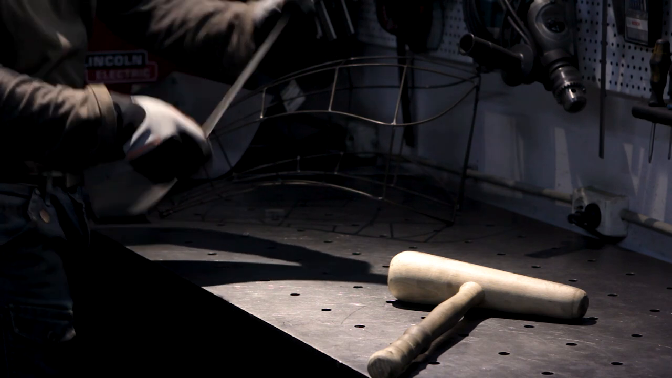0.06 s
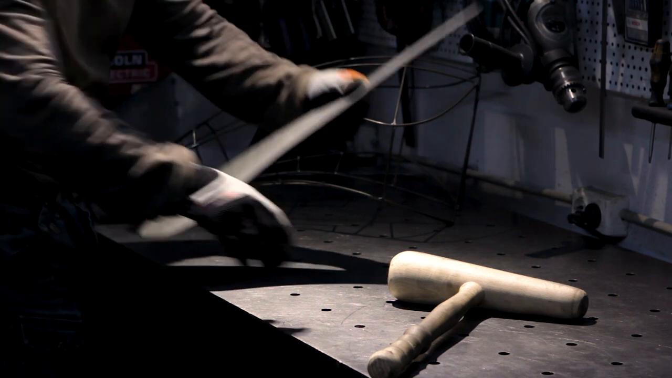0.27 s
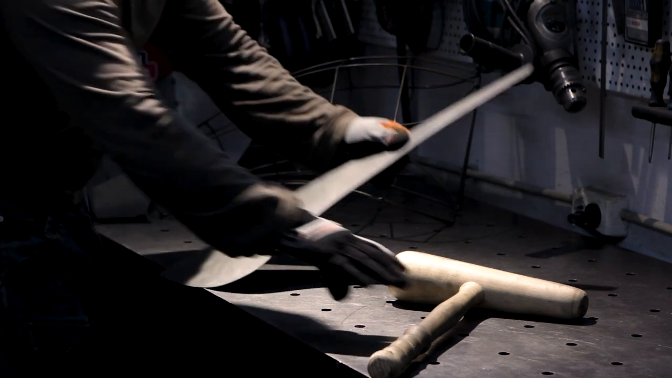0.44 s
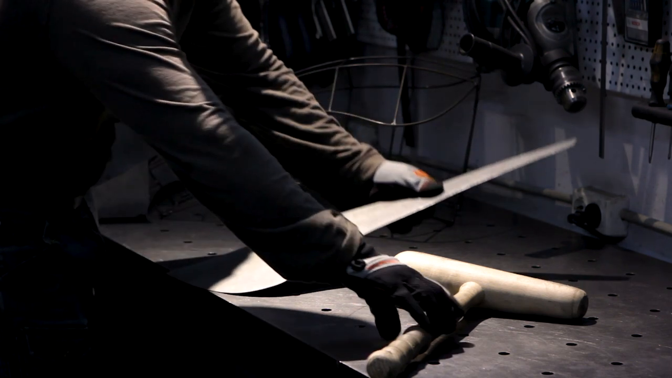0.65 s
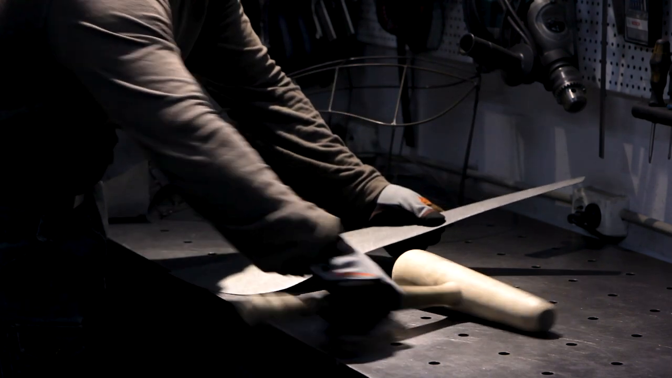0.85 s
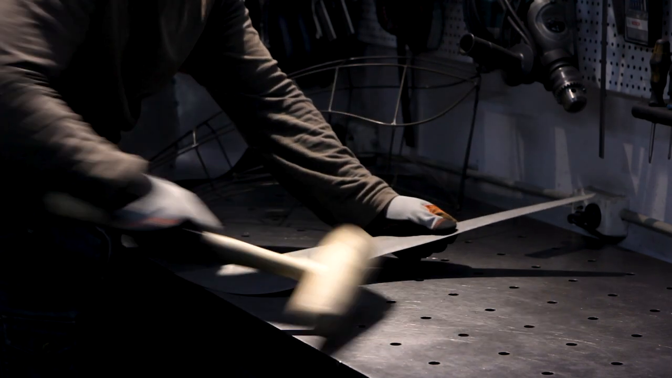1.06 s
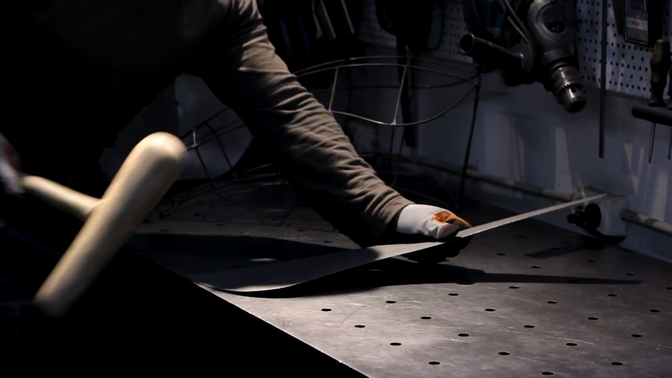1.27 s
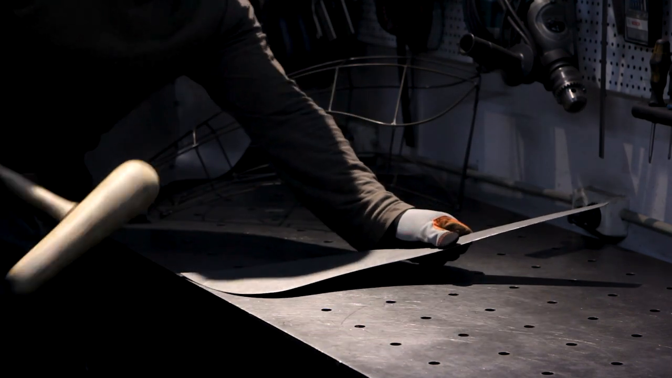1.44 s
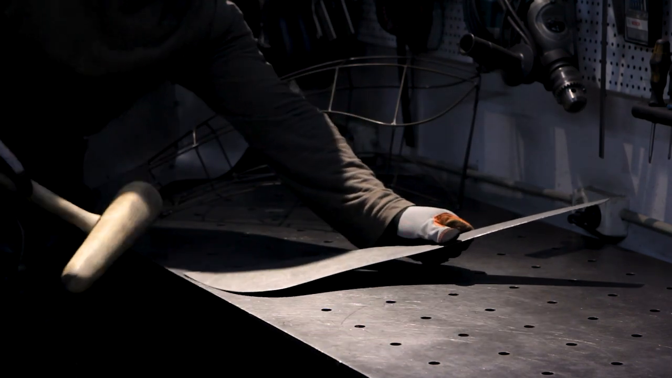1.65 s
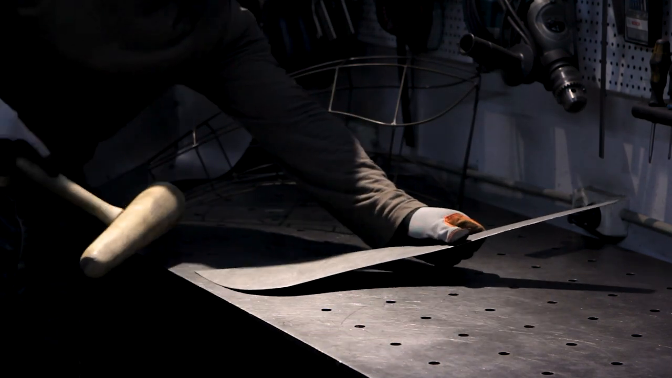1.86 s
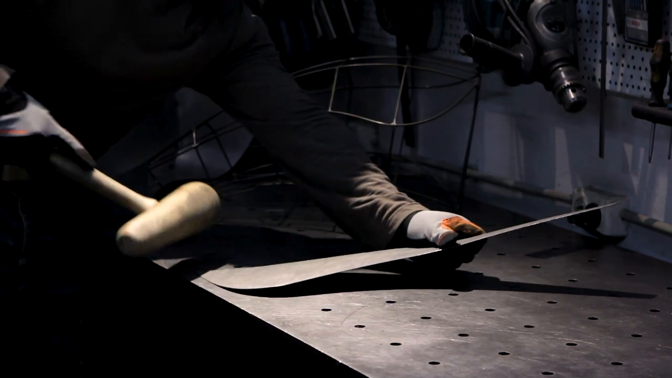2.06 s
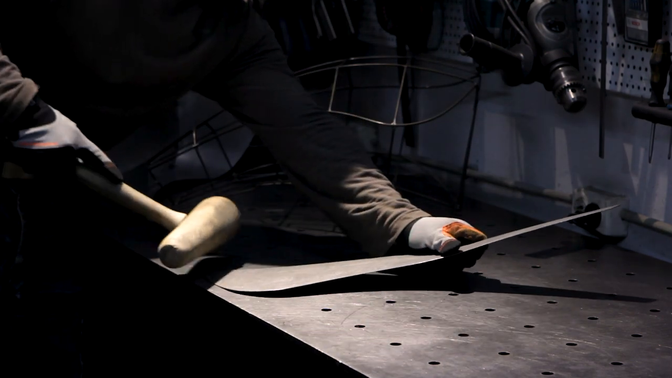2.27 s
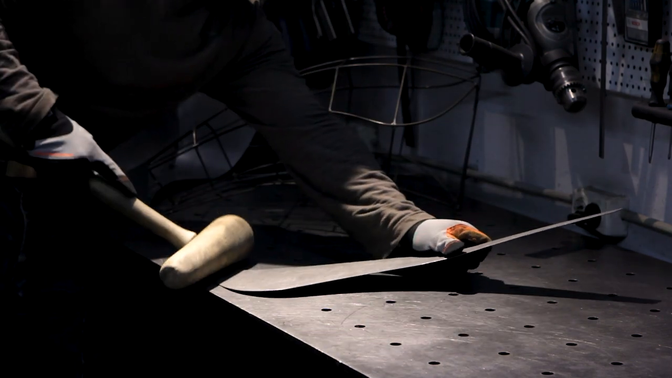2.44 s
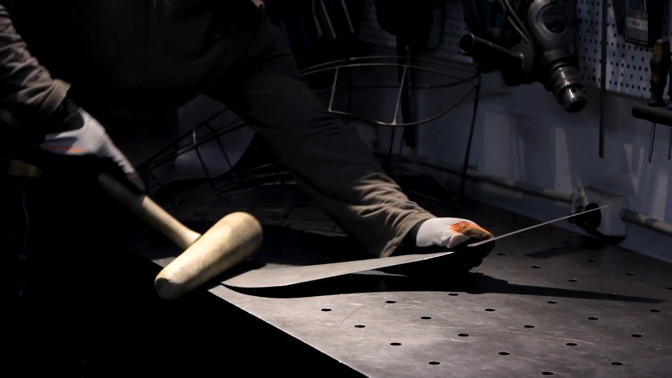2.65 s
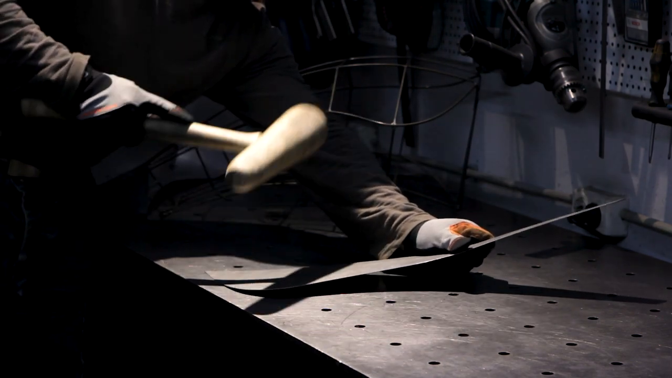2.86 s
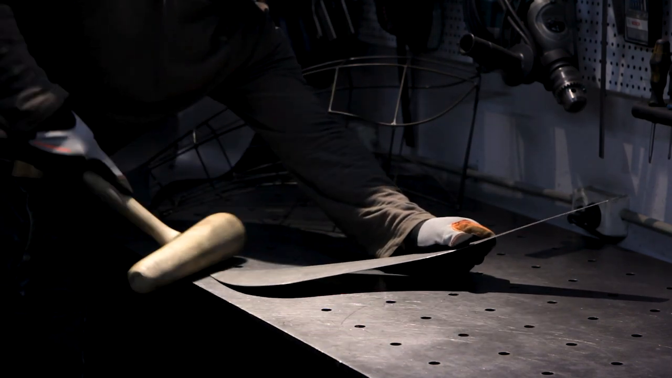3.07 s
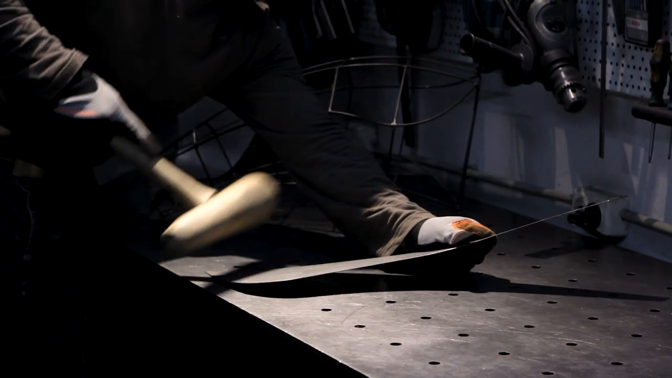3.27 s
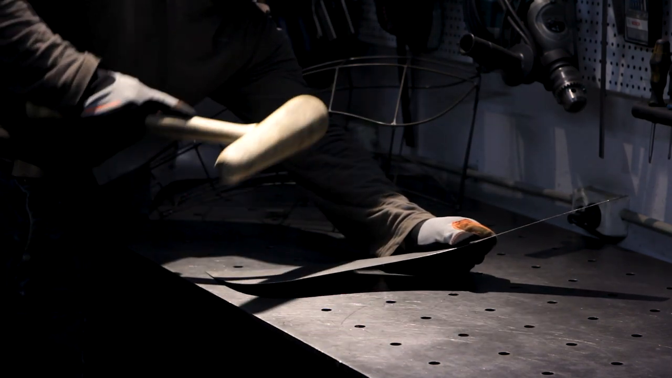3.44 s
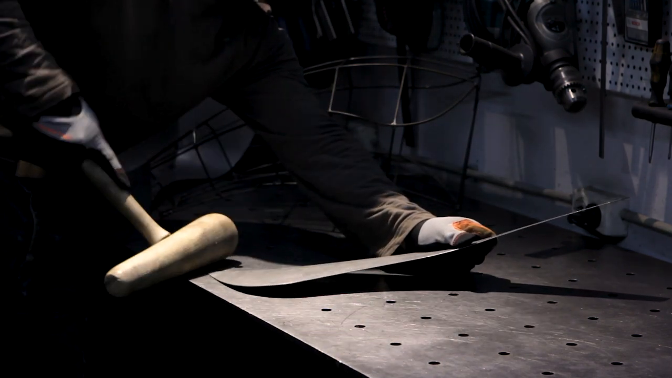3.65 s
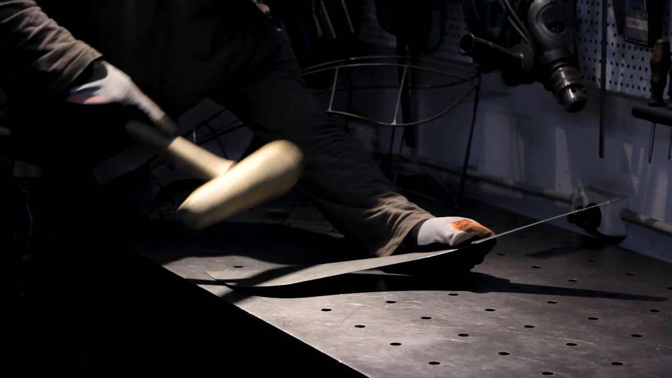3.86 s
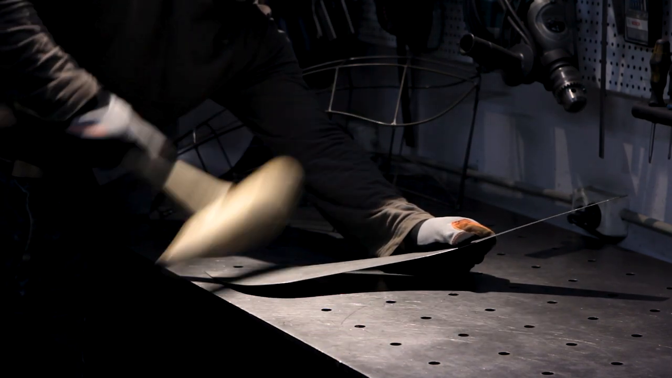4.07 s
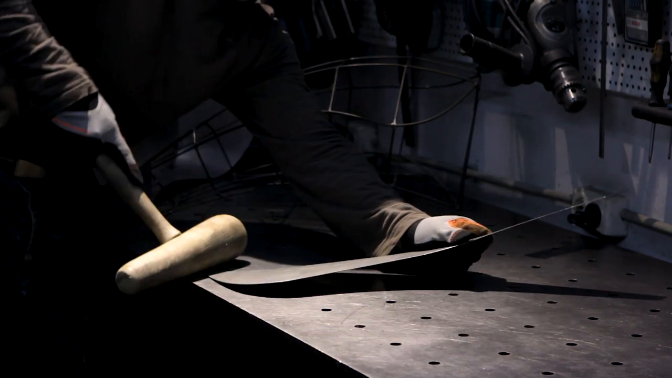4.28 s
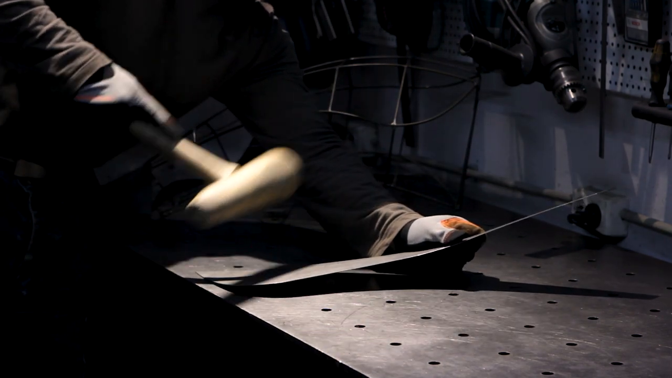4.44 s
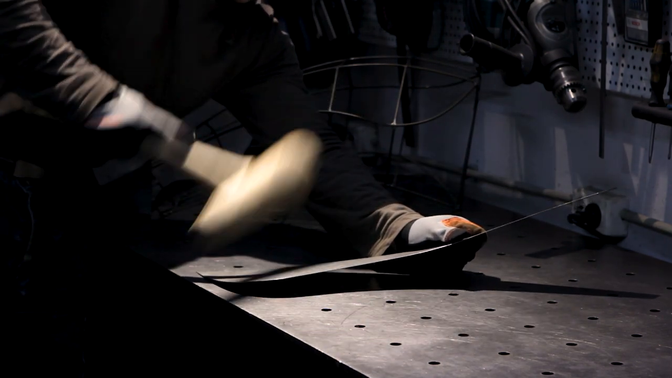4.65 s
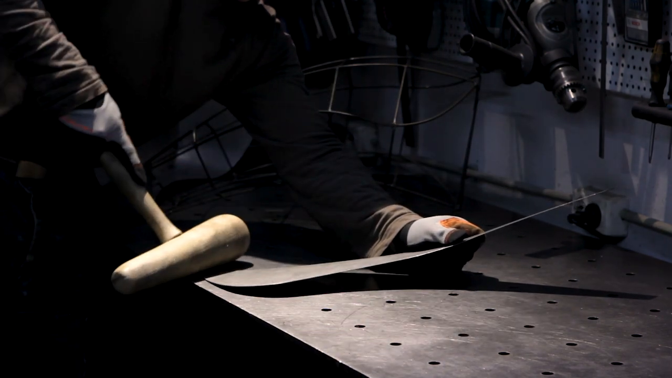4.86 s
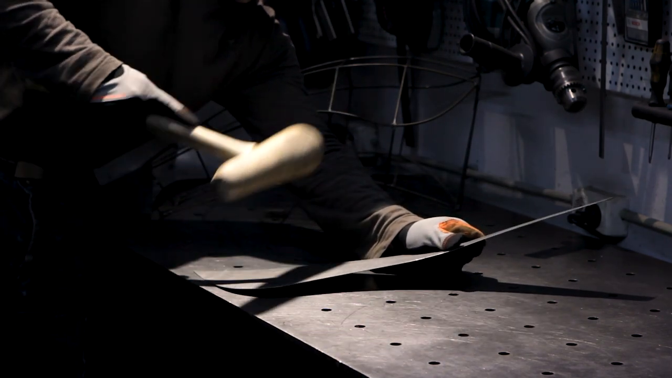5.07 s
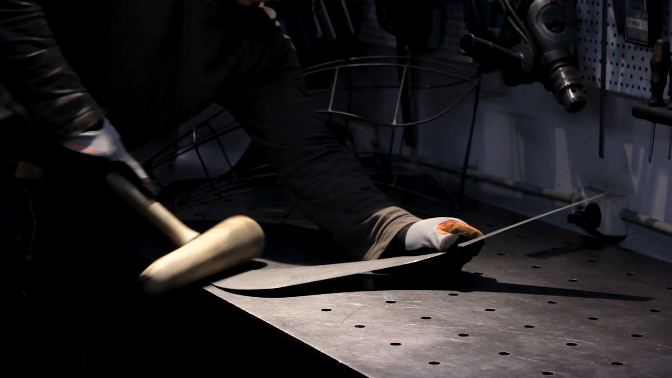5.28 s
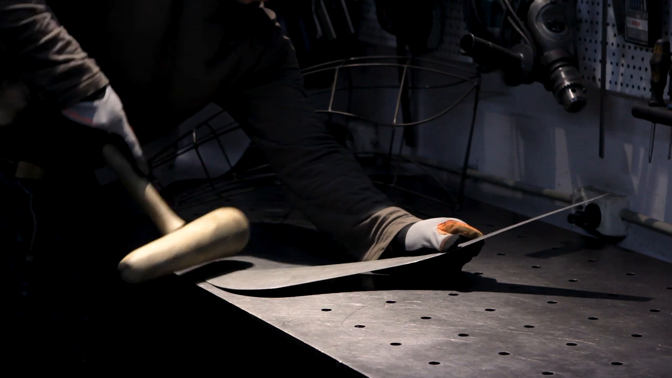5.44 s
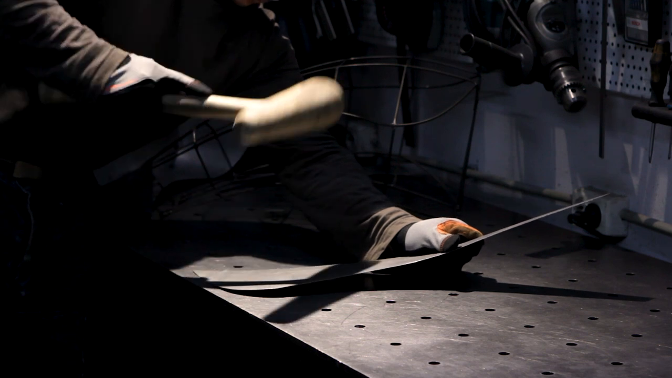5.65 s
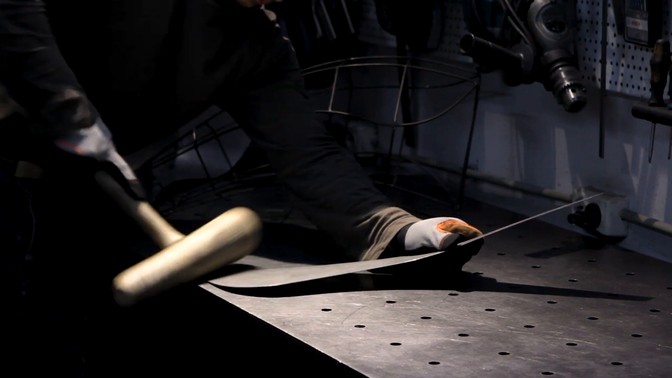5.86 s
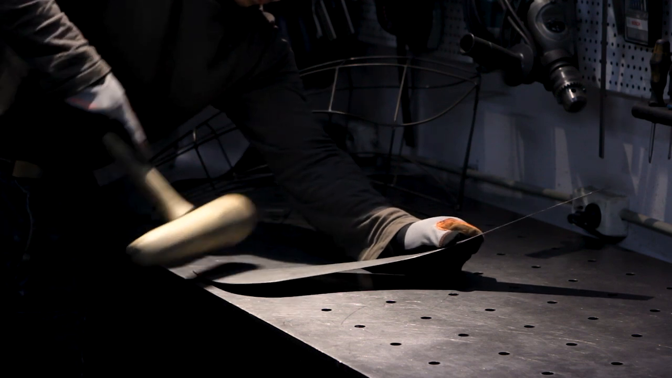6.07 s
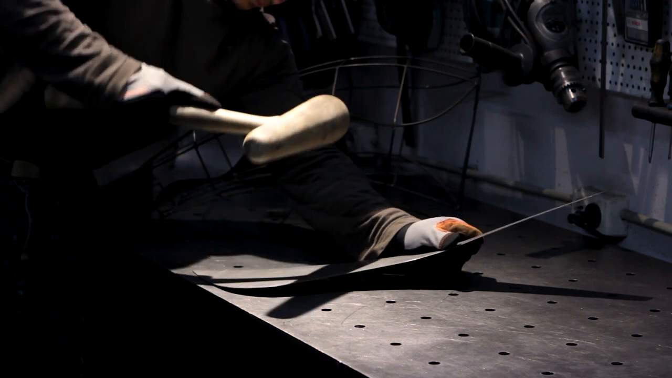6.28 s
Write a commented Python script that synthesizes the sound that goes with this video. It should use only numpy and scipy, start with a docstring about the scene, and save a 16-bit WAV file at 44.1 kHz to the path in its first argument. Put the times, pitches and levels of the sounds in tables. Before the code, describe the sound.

Six hard, evenly spaced wooden mallet blows on a steel sheet dominate, each clanging and ringing the metal table beneath. Before them come much quieter handling sounds: the sheet clanking down, gloves brushing and sliding it, a dull knock and a few small edge ticks. A brief scrape ends the sequence. The workshop is otherwise quiet, and the single microphone sits in the left channel, distorting on the hits.

```python
"""Faint shop hiss and a brush of gloves, then a curved steel sheet clanks onto a steel welding table.
Gloves slide the sheet, the mallet is picked up, the sheet rocks and ticks, six even mallet blows fall,
and a last rub follows. Each hit is a wash of dense steel modes plus the ring of the table top; light
knocks also ring the loose sheet. One microphone feeds the left input, which the blows overload;
the right input is unplugged and carries hiss and a trace of crosstalk."""
import sys
import numpy as np
from scipy import signal
from scipy.fft import rfft, irfft, next_fast_len
from scipy.io import wavfile
from scipy.ndimage import uniform_filter1d

SR = 44100
rng = np.random.default_rng(int(sys.argv[2]) if len(sys.argv) > 2 else 0)


def inscribe(sig):
    """Save sig as 16-bit PCM at rate SR to the path in sys.argv[1].

    A 1-D sig is mono; a 2-D sig holds one channel per row.
    Samples are clipped to [-1, 1] before scaling.
    """
    pcm = np.round(np.clip(np.atleast_2d(sig).T, -1, 1) * 32767)
    wavfile.write(sys.argv[1], SR, pcm.astype(np.int16))


N = 278271
TIME = np.arange(N) / SR
EDGES = 30 * 2 ** np.arange(0, 9.4, 1 / 3)   # third-octave bands [Hz]
CENTRES = np.sqrt(EDGES[1:] * EDGES[:-1])


def amp(db):
    """Decibels to gain."""
    return 10 ** (np.asarray(db) / 20)


def rms_one(x):
    """Scales to rms 1."""
    return x / np.sqrt(np.mean(x ** 2) + 1e-20)


def at_hz(curve, hz):
    """Reads a curve on a log-frequency axis."""
    freqs, values = np.array(curve).T
    return np.interp(np.log(hz), np.log(freqs), values)


def colour_db(hz, bass_db, treble_db):
    """Tilt EQ in dB per octave: one slope below 1 kHz, another above."""
    octaves = np.log2(hz / 1000)
    return bass_db * np.minimum(octaves, 0) + treble_db * np.maximum(octaves, 0)


def noise_bands(spectrum, peaky_db=0, width_hz=20):
    """Third-octave noise bands shaped to a spectrum, total power 1; narrow peaks act as crowded modes."""
    size = next_fast_len(N)
    bins = int(width_hz * size / SR) + 1
    peaks = uniform_filter1d(uniform_filter1d(rng.standard_normal(size // 2 + 1), bins), bins)
    ripple = amp(2 * peaky_db * np.tanh(rms_one(peaks) / 2))
    noises = irfft(rfft(rng.standard_normal((2, size))) * ripple, size)[:, :N]
    bands = []
    for k, edges in enumerate(zip(EDGES, EDGES[1:])):
        bandpass = signal.butter(2, edges, "band", fs=SR, output="sos")
        bands.append(rms_one(signal.sosfilt(bandpass, noises[k % 2])))   # neighbours stay unrelated
    gains = amp(at_hz(spectrum, CENTRES)) * np.sqrt(CENTRES)
    return np.array(bands) * gains[:, None] / np.linalg.norm(gains)


def ring(force, hz, t60):
    """Resonator: a unit click sets a sine of height 1 ringing."""
    r, w = amp(-60 / (t60 * SR)), 2 * np.pi * hz / SR
    return signal.lfilter([0, np.sin(w)], [1, -2 * r * np.cos(w), r * r], force + 1e-18)


def fade(x, t60):
    """One-pole tail that loses 60 dB in t60 seconds."""
    return signal.lfilter([1], [1, -amp(-60 / (t60 * SR))], x + 1e-18)


# Noise bed of shop and preamp: (frequency [Hz], relative density [dB])
SHOP_SPECTRUM = [(18, -40), (30, -4), (212, -11), (255, -11), (432, -12), (506, -5), (547, -16),
                 (3380, -18), (16500, -29)]
def shop_tone():
    """The quiet shop and the preamp lay a steady hiss under everything."""
    return amp(-78.5) * noise_bands(SHOP_SPECTRUM).sum(axis=0)


# Tone of rubbing, also heard in the edge ticks: (frequency [Hz], relative density [dB])
RUB_SPECTRUM = [(290, -67), (500, -31), (554, -13), (680, -22), (872, -12), (2260, -6), (8800, -2),
                (15100, -4), (16500, -5)]
# Glove and sheet moves: (peak time [s], build-up [s], level [dB], brightness [dB/octave],
# focus around 4.5 kHz [dB/octave squared])
GLOVE_STROKES = [(0.002, 0.0024, -76, 0.5, -1), (0.154, 0.045, -91, -1.5, 4),
                 (1.065, 0.13, -62, -5.5, -0.5), (1.37, 0.15, -64, -3, -0.5), (1.435, 0.027, -71.5, -3, -1),
                 (1.61, 0.094, -53, -1, 3), (1.85, 0.11, -64.5, 0.1, -2), (1.89, 0.03, -66, 3, 2),
                 (2.035, 0.035, -69.5, 5, 0.5), (2.16, 0.074, -62.5, -2, 4), (2.235, 0.055, -71.5, 0.5, -1),
                 (2.39, 0.056, -81, -3, -3), (2.5, 0.038, -69.5, 0.5, -5), (2.61, 0.06, -64.5, -5.5, -3.5),
                 (2.76, 0.072, -62.5, -0.5, 0), (3.06, 0.17, -73.5, 1.5, 0), (6.33, 0.32, -41.5, 1, 11)]
def glove_strokes(bands):
    """Gritty friction swells, dulls and dies away. Returns the rustle and its envelope."""
    release_db_per_s, dulling_db_per_octave_s = 121, 17
    octaves = np.log2(CENTRES[:, None] / 6000)
    grains = (rng.random(N) < 300 / SR) * rng.random(N)   # about 300 a second
    grit = 1 + 0.36 * fade(grains, t60=0.071)
    rustle, friction = np.zeros(N), np.zeros(N)
    for peak, build, level_db, bright_db, focus_db in GLOVE_STROKES:
        span = slice(max(int((peak - build) * SR), 0), int(peak * SR) + SR // 3)
        age = TIME[span] - peak
        swell = np.clip(1 + age / build, 0, 1) ** 1.1
        envelope = grit[span] * swell * amp(level_db - release_db_per_s * np.maximum(age, 0))
        tilt_db = bright_db - dulling_db_per_octave_s * np.clip(age, -0.1, 0.1)
        skirt_db = max(focus_db, -1) * np.log2(CENTRES[:, None] / 4500) ** 2
        rustle[span] += envelope * np.sum(amp(tilt_db * octaves - skirt_db) * bands[:, span], axis=0)
        friction[span] += envelope
    return rustle, friction


# Handling knocks, from the sheet's edge landing to the mallet being set on it: (time [s], level [dB],
# bass slope [dB/octave], treble slope [dB/octave], attack [s], table ring send [dB],
# ring's lean to the bass [dB/octave], sheet pitch [Hz], sheet ring level [dB], sheet decay [x t60])
LIGHT_KNOCKS = [(0.5518, -52.5, 2.5, 7, 0.0054, -8, 8, 684, -61.5, 0.76),
                (.8130, -29.5, -1.5, -7, 0.022, -17, 2, 598, -48, 0.52),
                (1.816, -72, 18, -2, 0.016, -4.5, -1, 645, -73, 1.24),
                (2.564, -40.5, -7, -15, 0.01, -13.5, 2.5, 620, -53.5, 0.78)]
# Modes of the loose sheet: (frequency [x sheet pitch], level [dB], t60 [s])
SHEET_MODES = [(1, 1.5, 0.91), (1.269, -1.5, 0.62), (1.659, -4, 0.58), (1.991, -19, .7), (3.049, -22, .7),
               (4.02, -13, 0.46)]
def sheet_ring():
    """Each light knock rings the sheet at the pitch of its present bend; paired modes beat."""
    split_hz, partner_db = 10.7, -1
    out = np.zeros(N)
    for start, *_, pitch_hz, level_db, decay_scale in LIGHT_KNOCKS:
        age = np.maximum(TIME - start, 0)
        blurred_contact = rng.standard_normal(N) * (age > 0) * amp(-60 * age / 0.42)
        push = amp(level_db) * blurred_contact / np.sqrt(0.021 * SR)
        for ratio, mode_db, t60 in SHEET_MODES:
            mode = ring(push, pitch_hz * ratio, t60 * decay_scale)
            partner = ring(push, pitch_hz * ratio + split_hz, t60 * decay_scale)
            out += amp(mode_db) * (mode + amp(partner_db) * partner)
    return out


# Wash of sheet, table and shop: (frequency [Hz], relative density [dB])
WASH_SPECTRUM = [(24, -33), (40, -31.5), (233, -13.5), (510, -15.5), (608, -4.5), (823, -6.5), (1090, 0.5),
                 (1260, 0.5), (2140, -3), (2310, -4), (4920, -11.5), (8360, -14), (14900, -18),
                 (16500, -78)]
# Tail of the wash: (frequency [Hz], t60 [s])
WASH_DECAY = [(60, 1), (250, 0.65), (1000, 0.63), (3000, 0.67), (8000, 0.53), (16000, 0.28)]
def steel_wash(hits):
    """Modes too dense to tell apart: noise that swells as the walls answer and dies band by band."""
    bands = noise_bands(WASH_SPECTRUM, peaky_db=3.0, width_hz=20.6)
    out = np.zeros(N)
    for start, level_db, bass_db, treble_db, attack, *_ in hits:
        first = int(start * SR)
        age = TIME[:min(SR, N - first)]
        span = slice(first, first + len(age))
        gains = amp(level_db + colour_db(CENTRES, bass_db, treble_db))
        for hz, gain, band in zip(CENTRES, gains, bands):
            rise = 1 - np.exp(-age / (attack + 4.2 / hz))   # lows need some cycles to start
            out[span] += gain * rise * amp(-60 * age / at_hz(WASH_DECAY, hz)) * band[span]
    return out


# Mode clusters of the table top: (frequency [Hz], level [dB], t60 [s])
TABLE_MODES = [(167, -52, 0.85), (305.4, -17, 1.04), (440.4, -10, 0.42), (612.6, -14, 0.93),
               (678, -10.5, 0.79), (836, -6.5, 0.33), (1014.8, -4, 0.76), (1047, 2.5, 0.45),
               (1103, 0, 0.71), (1187, 4, 0.32), (1233, -5, 0.77), (1282, -2, 0.42), (1478, 0.5, 0.51),
               (1544, -6.5, 0.78), (1631, -11.5, 1.02), (1816, -12.5, 0.82), (2117, -5, 0.89),
               (2215, 1.5, 0.35), (2390, -6.5, 0.19), (2570, 2.5, 0.5), (2805, -6, 0.69), (2980, -9, 0.23),
               (3276, -24, 0.18), (3440, -11, 0.77), (3797, -18.5, 1.15), (4260, -9.5, 0.74),
               (5140, -11, 0.78), (6510, -10, 0.67), (7950, -6, 0.5)]
def table_ring(hits, friction):
    """Clusters of close, beating modes: each hit rings them in its own mix, and rubbing makes them sing."""
    rub_send_db, cluster_width = -28, 0.011   # width as a share of the pitch
    scatter_db = rng.normal(0, 2.6, (len(hits), len(TABLE_MODES)))
    noise = rng.standard_normal(N)
    out = np.zeros(N)
    for k, (hz, mode_db, t60) in enumerate(TABLE_MODES):
        rub = friction * amp(rub_send_db + colour_db(hz, bass_db=-0.5, treble_db=5.3))
        envelope = fade(rub / (0.13 * SR), t60)
        for hit, own_db in zip(hits, scatter_db[:, k]):
            start, level_db, bass_db, treble_db, attack, send_db, lean_db = hit
            first = int(start * SR)
            age = TIME[:min(SR * 3 // 2, N - first)]
            tone_db = colour_db(hz, bass_db - lean_db, treble_db - lean_db)
            shape = (1 - np.exp(-age / attack)) * amp(-60 * age / t60)
            envelope[first:first + len(age)] += amp(level_db + send_db + own_db + tone_db) * shape
        cluster = rms_one(ring(noise, hz, t60=np.log(1000) / (np.pi * cluster_width * hz)))
        out += amp(mode_db) * envelope * cluster
    return out


# Ticks of the sheet's edge: (time [s], level [dB])
EDGE_TICKS = [(2.4753, -76), (2.5461, -65), (2.5995, -63), (2.7077, -67), (2.771, -54.5), (2.8918, -62)]
def edge_ticks(bands):
    """The edge taps the table: bright noise with an instant attack and a short tail."""
    clicks = np.zeros(N)
    for start, level_db in EDGE_TICKS:
        clicks[int(start * SR)] = amp(level_db)
    return fade(clicks, t60=0.21) * bands.sum(axis=0)


# Mallet on the sheet: (time [s], level [dB], bass slope [dB/octave], table ring send [dB])
MALLET_BLOWS = [(3.1263, -5.5, -0.5, -19), (3.6500, -5, 0, -17), (4.2067, -5, 5, -16),
                (4.8034, -5.5, 2.8, -17.5), (5.3600, -6, 3, -14.5), (5.9300, -6, -0.5, -26)]
def mallet_blows():
    """Six hard hits to drive the wash and the table, all with the same attack and treble slope."""
    attack_s, treble_db, lean_db = 0.006, 1.32, 0.8   # slopes per octave
    return [(start, level_db, bass_db, treble_db, attack_s, send_db, lean_db)
            for start, level_db, bass_db, send_db in MALLET_BLOWS]


def scene():
    """One microphone, deaf to the deep bass, on the left input; nothing on the right."""
    rub_bands = noise_bands(RUB_SPECTRUM, peaky_db=3.5, width_hz=22)
    rustle, friction = glove_strokes(rub_bands)
    bed = shop_tone()
    hits = mallet_blows() + [knock[:7] for knock in LIGHT_KNOCKS]
    steel = steel_wash(hits) + table_ring(hits, friction) + sheet_ring() + edge_ticks(rub_bands)
    low_cut = signal.butter(2, 90, "high", fs=SR, output="sos")
    return np.array([bed + signal.sosfilt(low_cut, rustle + steel), np.zeros(N)])


# Hiss of the unplugged input: (frequency [Hz], relative density [dB])
IDLE_SPECTRUM = [(30, -11), (300, 2.5), (1500, -2), (6000, -5), (11500, -5.5), (13000, -21), (16500, -1.5)]
# Standing voltage of each converter, left then right: (offset [full scale])
DC_OFFSETS = [
    [-0.000082],
    [0.00069],
]
def record(dry):
    """The preamp doubles and clips hard; while it clips, the idle input's hiss rises."""
    clip_knee, idle_db, leak_db, crosstalk_db = 0.21, -79, -68.5, -68
    hot = 2 * dry[0]
    clipped = hot / (1 + np.abs(hot / clip_knee) ** 6.7) ** (1 / 6.2)
    left = signal.lfilter([1, -1], [1, -np.exp(-2 * np.pi * 30 / SR)], clipped)   # coupling capacitor
    overload = uniform_filter1d((np.abs(hot) > 1.5 * clip_knee) * 1., size=400)
    hiss = noise_bands(IDLE_SPECTRUM).sum(axis=0) * (amp(idle_db) + amp(leak_db) * overload ** 0.78)
    right = hiss + amp(crosstalk_db) * np.roll(left, shift=34)   # a trace crosses over, late
    high_cut = signal.ellip(12, .5, 75, 15900, fs=SR, output="sos")
    return signal.sosfilt(high_cut, np.array([left, right]) + DC_OFFSETS)


dry = scene()
out = record(dry)
inscribe(out)
```